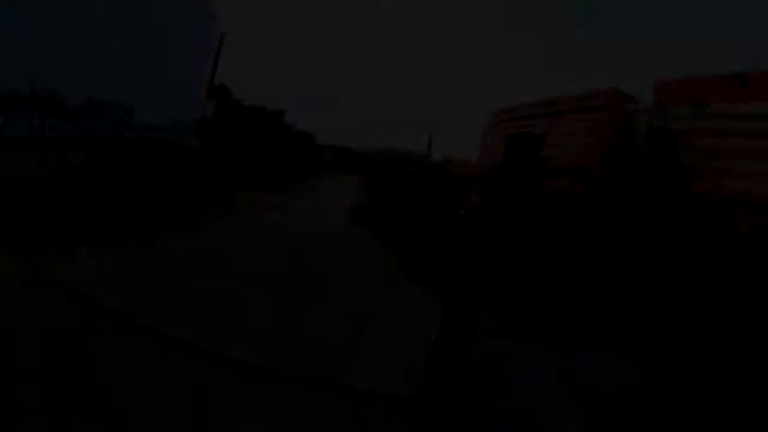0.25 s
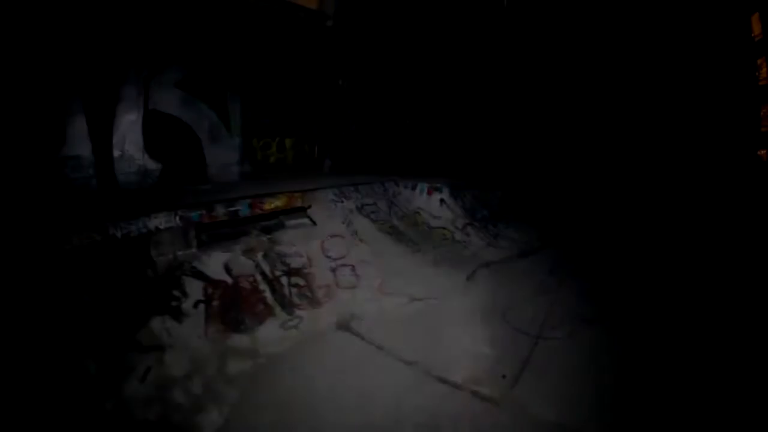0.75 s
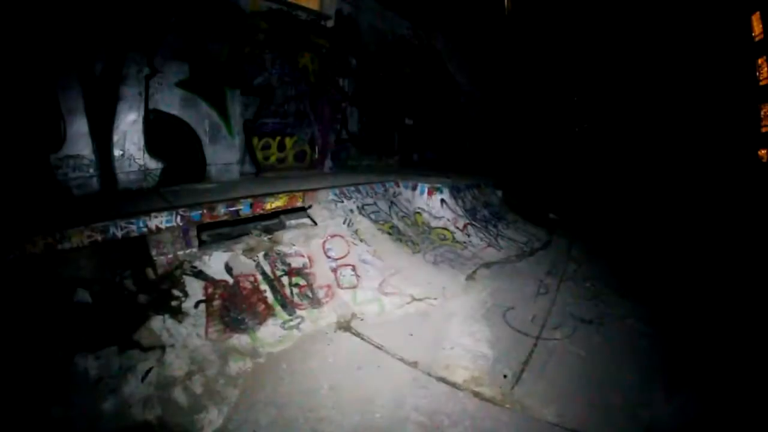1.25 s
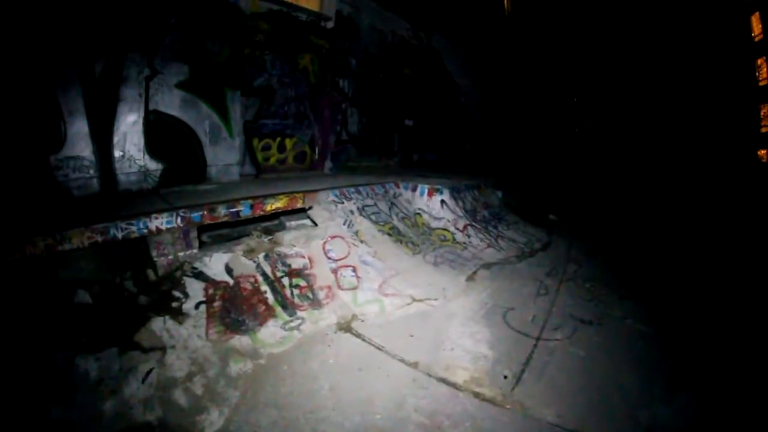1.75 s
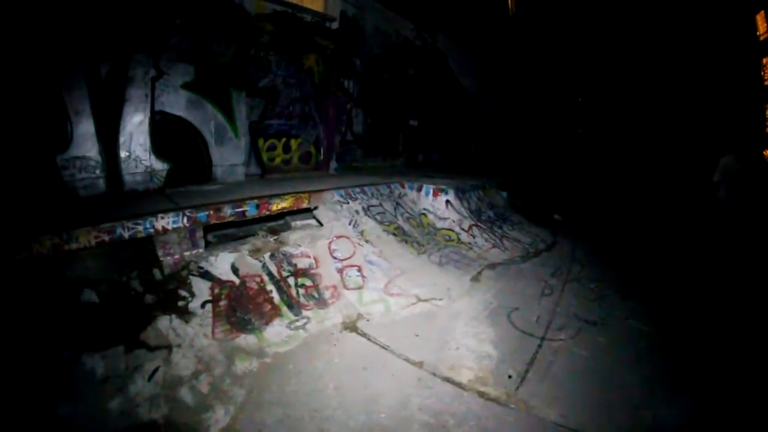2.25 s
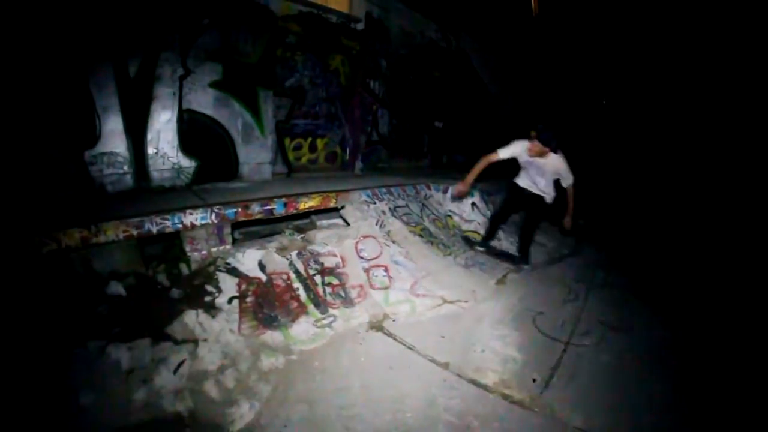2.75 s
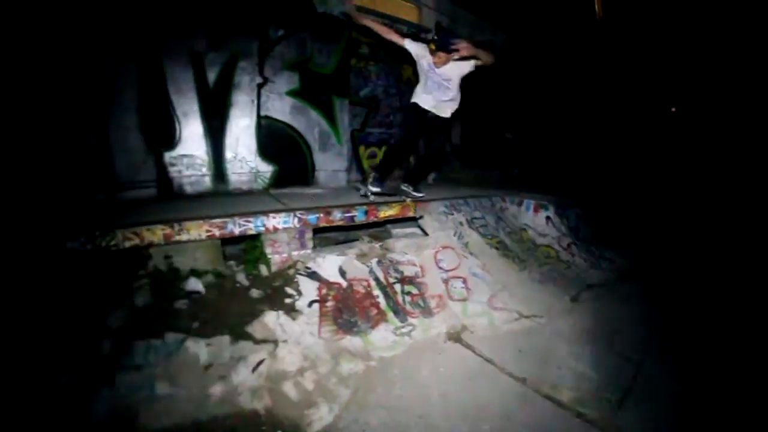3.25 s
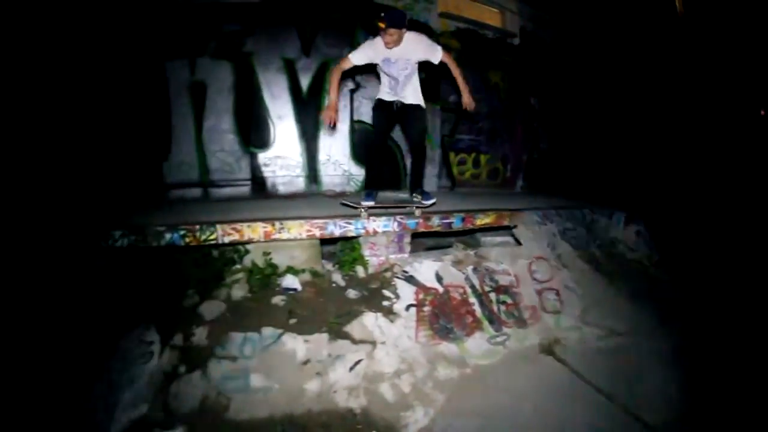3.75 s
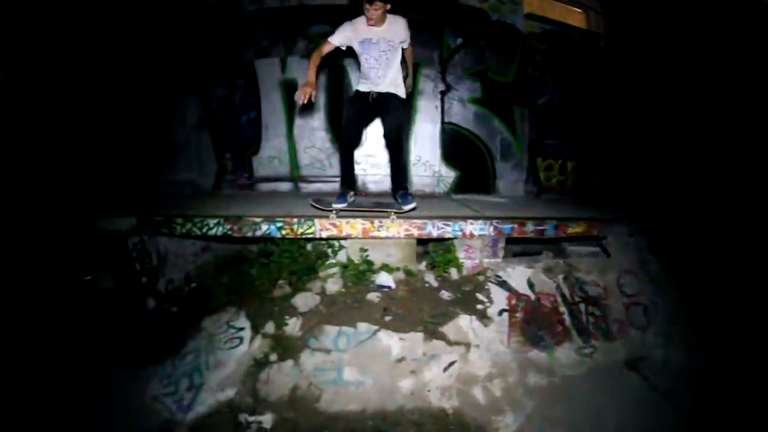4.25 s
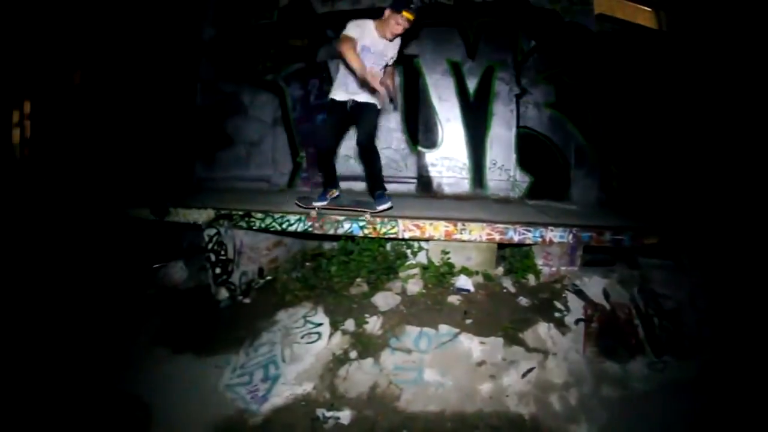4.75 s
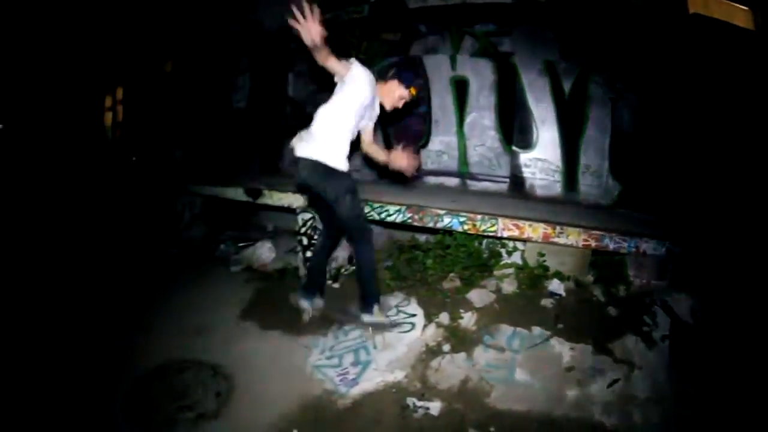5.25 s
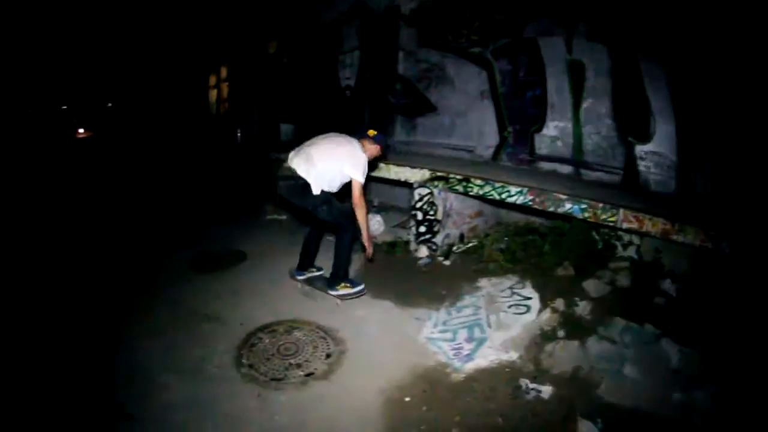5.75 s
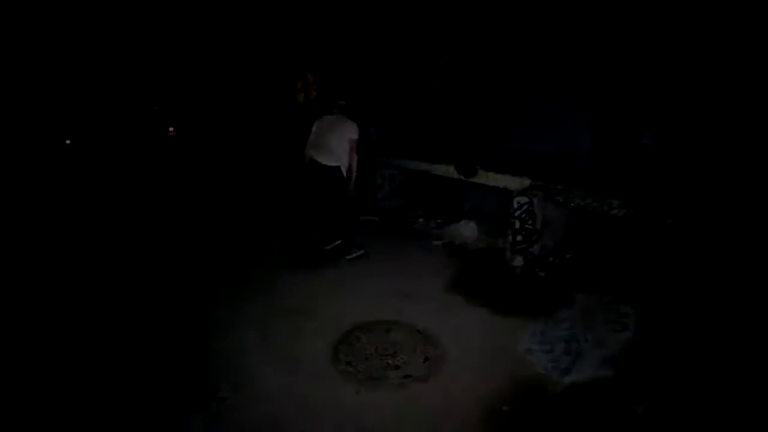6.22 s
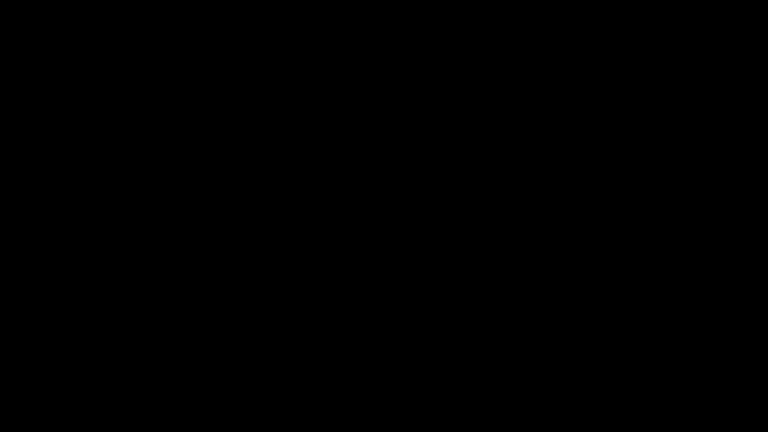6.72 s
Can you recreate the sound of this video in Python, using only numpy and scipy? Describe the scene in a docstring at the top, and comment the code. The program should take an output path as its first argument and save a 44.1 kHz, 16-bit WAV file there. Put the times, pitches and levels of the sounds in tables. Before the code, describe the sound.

A skateboard scuffs on concrete, drops and rumbles up a rough bank, clacks onto a ledge, rolls along, then slams down and rolls away.

```python
"""On outdoor concrete, a skateboard is scuffed into place, dropped, and rumbles up a rough bank.
It clacks onto a ledge, rides over its joints, scrapes off the end, lands hard and rolls away over gritty pavement.
Rolling is noise from tiny random impacts; each blow is a short burst of force that rings the board.
Scrapes are strokes of grit that ring the steel trucks. A wall behind the ledge answers the blows.
Faint air, shuffling, a puff of breeze and two ticks complete the mono scene."""
import sys
import numpy as np
from scipy import signal
from scipy.fft import rfft, irfft, next_fast_len
from scipy.io import wavfile
from scipy.ndimage import uniform_filter1d, map_coordinates

SR = 44100
rng = np.random.default_rng(int(sys.argv[2]) if len(sys.argv) > 2 else 0)


def generate_wav(signal):
    """Clip the signal to [-1, 1] and save it as 16-bit WAV at the path in sys.argv[1]."""
    frames = np.transpose(np.atleast_2d(signal))
    scaled = np.clip(frames, -1, 1) * 32767
    pcm = np.round(scaled).astype(np.int16)
    wavfile.write(sys.argv[1], SR, pcm)


N = 307906  # length of the scene in samples

# the run: dropped on the ground, onto the ledge, all wheels down, off its end, back on the ground
DROP_S, LOCK_S, RIDE_S, LEAVE_S, LAND_S = 1.62, 3.19, 3.335, 5.0, 5.44
# the closing fade: its start, its speed and how far down it goes
FADE_S, FADE_DB_PER_S, FADE_DEPTH_DB = 6.48, 241, 19.5
# resonances of the deck under the rider: pitch_hz, width_hz, level_db
BOARD_MODES = [(208, 48, 3), (290.7, 17, 6), (520, 120, -1), (617, 85, 0.5), (862, 16, 5.5),
               (1056, 19, -4.5), (1203, 45, -2), (1500, 46, -0.5), (2333, 35, -8), (2930, 26, -7.5)]
# colour of a bare contact, before the board rings: pitch_hz, relative level_db
CONTACT_TONE = [(40, -26.5), (120, -10.5), (290, -1), (430, -7.5), (1000, -2), (2000, -12), (7000, -14),
                (12000, -12.5), (15000, -14.5)]
# colour of the rolling on the smooth ledge: pitch_hz, relative level_db
SMOOTH_TONE = [(65, -11.5), (110, -12.5), (176, -1.5), (254, -17), (389, -18), (609, -11), (1290, -12),
               (3040, -30), (5600, -29), (12200, -23), (14300, -28)]
# where the low register meets the middle, and the middle meets the high: pitch_hz
REGISTER_EDGES_HZ = (400, 2500)


def rolling(level_db, tone, rate, spread_db, ring, rumble_db, roar_db, hiss_db,
            lumpy_db=1.17, surge_db=1.0, patchy_db=2.7, low_hz=50):
    """Wheels crush over grains; bumps swell the noise, the deck rings along, the rumble needs the rider's weight."""
    # the rider unweights the board and the rumble drops out: middle_s, half_length_s, depth_db
    lifts = [(2.412, 0.039, 22), (6.245, 0.093, 18)]
    road = grit(N, rate, spread_db) + .5 * rng.standard_normal(N)
    road = road * amp(lumpy_db * wobble(70) + surge_db * wobble(22))

    def surface(hz):
        low_cut = hz ** 2 / (hz ** 2 + low_hz ** 2)
        return causal(amp(along(tone, hz)) * low_cut) * (1 + ring * ringing(BOARD_MODES, hz))

    road = filtered(road, surface)
    rumble, roar, hiss = (filtered(road, lambda hz: register(hz, k)) for k in range(3))
    lift_db = sum(depth * np.exp(-((clock() - s) / half) ** 2) for s, half, depth in lifts)
    mix = amp(rumble_db - lift_db) * unit(patchy(rumble, patchy_db))
    mix += amp(roar_db) * unit(patchy(roar, patchy_db))
    mix += amp(hiss_db) * unit(hiss)
    return amp(level_db) * mix


def bank(rumble_grows=0.46, far_hiss_db=-13, near_hiss_db=-8.0, near_s=2.36, nearing_s=0.075):
    """Pressing into the bank deepens the rumble; the grit grows brighter as the board comes near."""
    # how hard the wheels work on the bank: time_s, level_db
    bank_work = [(1.65, -48), (2.356, -41), (2.454, -46.5), (2.478, -40), (2.848, -36.5), (2.872, -40),
                 (3.12, -45.5)]
    # colour of the rolling there: pitch_hz, relative level_db
    bank_tone = [(41, -45), (70, -8), (150, -2), (578, 2), (1110, 2.5), (1700, -9), (2660, -23),
                 (7820, -28.5), (12800, -24.5), (15000, -31)]
    level = follow(bank_work)
    load_db = level - np.mean(np.array(bank_work)[:, 1])
    near = .5 + .5 * np.tanh((clock() - near_s) / nearing_s)
    hiss_db = far_hiss_db + (near_hiss_db - far_hiss_db) * near
    sound = rolling(level, bank_tone, rate=1600, spread_db=3.7, ring=0.56,
                    rumble_db=rumble_grows * load_db - 7.5, roar_db=-5.0, hiss_db=hiss_db)
    return between(DROP_S, LOCK_S) * sound


def ledge(settled_db=-61, extra_start_db=5.5, slowing_s=0.67):
    """On the smooth ledge the ride starts louder and quietens as the board loses speed."""
    level = settled_db + extra_start_db * np.exp(-np.maximum(clock() - RIDE_S, 0) / slowing_s)
    sound = rolling(level, SMOOTH_TONE, rate=2000, spread_db=5.0, ring=0.48,
                    rumble_db=1.5, roar_db=-2, hiss_db=0.0)
    return between(RIDE_S, LEAVE_S) * sound


def pavement(hiss_steadiness=0.69, rumble_fade_db_per_s=5):
    """Rolling away: the rumble recedes, and the hiss of loose grit swings less than the roar."""
    # how hard the wheels work on the pavement: time_s, level_db
    pavement_work = [(5.53, -60.5), (5.588, -49.5), (5.754, -59), (5.886, -65), (6.162, -61),
                     (6.328, -52.5), (6.386, -58.5)]
    # colour of the rolling there: pitch_hz, relative level_db
    pavement_tone = [(41, -41), (70, -3.5), (114, -12.5), (153, -0.5), (332, -7), (567, -4), (1480, -10),
                     (2360, -20), (2880, -16), (4490, -23.5), (14300, -10)]
    level = follow(pavement_work)
    load_db = level - np.mean(np.array(pavement_work)[:, 1])
    away_db = rumble_fade_db_per_s * np.maximum(clock() - LAND_S, 0)
    sound = rolling(level, pavement_tone, rate=2800, spread_db=5, ring=0.29,
                    rumble_db=2.5 - away_db, roar_db=2.5, hiss_db=6.5 - hiss_steadiness * load_db)
    return between(LAND_S, FADE_S + FADE_DEPTH_DB / FADE_DB_PER_S) * sound


def free_wheels(spin_db=-58, fade_db_per_s=21, tipped_db=3):
    """Tipped onto the ledge and flying off its end, the unloaded wheels only whirr and run down."""
    def run_down(start, end):
        return between(start, end) * amp(-fade_db_per_s * np.maximum(clock() - start, 0))

    whirr = rolling(spin_db, SMOOTH_TONE, rate=6400, spread_db=5.0, ring=0.48,
                    rumble_db=-19.5, roar_db=-2.0, hiss_db=0.5)
    return whirr * (amp(tipped_db) * run_down(LOCK_S, RIDE_S) + run_down(LEAVE_S, LAND_S))


def wheel_hum(waver_hz=20, flutter_db=3.0):
    """A fuzzy tone that sinks as the wheels slow down."""
    # coasting wheels: start_s, end_s, first pitch_hz, sag_hz_per_s, level_db, fade_db_per_s (negative grows)
    hums = [(1.72, 2.422, 704.3, 195.1, -50, -2.5), (3.499, 4.59, 647.5, 51.8, -58.5, 4.5)]
    out = np.zeros(N)
    for start, end, hz, sag, db, fade in hums:
        age = np.clip(clock() - start, 0, end - start)
        turns = np.cumsum(hz - sag * age + waver_hz * wobble(90)) / SR
        tone = unit(np.sin(2 * np.pi * turns) * amp(flutter_db * wobble(50)))
        out += between(start, end) * amp(db - fade * age) * tone
    return out


def booms(boom_hz=153, width_octaves=0.39):
    """Under extra weight the deck passes on the lowest part of the road noise."""
    # the rider presses down and the deck booms: middle_s, half_length_s, level_db
    presses = [(2.062, 0.037, -53), (2.226, 0.048, -56), (2.848, 0.069, -45.5), (2.968, 0.05, -44)]
    low = filtered(rng.standard_normal(N), lambda hz: bell(hz, boom_hz, width_octaves))
    return unit(low) * sum(amp(db) * np.exp(-((clock() - s) / half) ** 2) for s, half, db in presses)


def clacks(joint_thump_db=-10.5, wheel_lag_s=.0085):
    """Single blows where the board comes down, and a quick pair wherever an axle crosses a joint or an edge."""
    # the board comes down, tail, wheels and deck in turn, then settles: start_s, knock level_db,
    # crack_db and strongest ring_hz, thump_db, tail_factor (crack and thump relative to the knock)
    falls = [(1.574, -34, -17, 730, -8, 0.8), (1.592, -35.5, -9.5, 815, -8.5, 0.95),
             (3.2004, -27, -4, 940, -21, 0.23), (3.2077, -32, 4, 890, -22, .4),
             (5.3674, -21.5, -3, 1180, -5, 1.5), (5.3774, -27, 0, 1503, -7.5, .9),
             (5.382, -26, -14.5, 1280, 1, 0.96), (5.3887, -28.5, 4, 1085, -1, 0.64),
             (5.3999, -21, -4.5, 800, -5, 0.46), (5.4055, -16.5, -3, 1180, -7, .65),
             (5.413, -28.5, -5.5, 1214, -2, 0.69), (5.429, -38, -9, 870, -6, 0.52),
             (5.4405, -36, -9.5, 740, -5.5, 0.5), (5.506, -42.5, -5.5, 880, -4, .6)]
    # an axle crosses a joint or an edge: start_s, knock level_db, crack_db relative to the knock,
    # strongest ring_hz, second_wheel_db relative to the first
    joints = [(2.141, -37, -16, 600, -8), (2.205, -38, -15, 400, -3.5), (2.357, -36.5, -14, 565, -6),
              (2.61, -36.5, -11, 675, -1), (2.771, -34, -4, 534, -10), (2.828, -36, -6, 500, -2),
              (3.061, -40.5, -2.5, 620, 0), (3.334, -42, -1.5, 490, -2.5), (3.41, -41.5, -2, 525, -9),
              (3.446, -31.5, 2.5, 630, -2.5), (3.7078, -37, 1.5, 477, 1.5), (3.939, -36, -5, 634, -5),
              (4.219, -46.5, -2.5, 526, -8), (4.843, -40.5, -2.5, 830, -6), (4.9324, -42.5, 0.5, 284, 3),
              (5.622, -51, 5, 700, -4), (6.151, -49.5, 7.5, 880, 1), (6.28, -44.5, -1.5, 533.5, 5.5)]
    out = np.zeros(N)
    for s, *strike in falls:
        add(out, s, blow(*strike))
    for s, db, crack_db, ring_hz, second_db in joints:
        add(out, s, blow(db, crack_db, ring_hz, joint_thump_db, 0.98))
        add(out, s + wheel_lag_s, blow(db + second_db, crack_db, ring_hz, joint_thump_db, 1))
    return out


def pits(ring_hz=1100, thump_db=-5.5, tail=0.78):
    """The wheels knock through small pits or off edges at uneven moments, each ringing at another pitch."""
    # start_s, knock level_db, crack_db relative to the knock
    pit_knocks = [(2.462, -43, -7), (2.507, -42, -12), (2.548, -42, -11), (2.557, -45, -3),
                  (2.638, -34, -6), (2.647, -41, -6), (2.704, -38, -0.5), (2.843, -38.5, -3),
                  (2.938, -39.5, -3.5), (3.725, -41.5, -1.5), (3.956, -46.5, -7), (4.603, -49.5, -1),
                  (5.0403, -42.5, 1.5), (5.574, -47.5, -14), (5.844, -51.5, -4)]
    out = np.zeros(N)
    for s, db, crack_db in pit_knocks:
        pitch_hz = ring_hz * 2 ** rng.uniform(-0.54, 0.66)
        add(out, s, blow(db, crack_db, pitch_hz, thump_db, tail))
    return out


def blow(db, crack_db, ring_hz, thump_db, tail, focus_db=6, focus_octaves=0.27, snap=1.0, snap_t60=0.013,
         attack=0.00027, push=5, contact_time=.0001, hardening=0.18, deck_ring=3):
    """A push, a hard snap and a short rattle of the trucks, ringing the board at new strengths."""
    # an ordinary blow, and its rattle before the tail factor
    usual_db, rattle_t60_s = -40.5, 0.048
    # this much more crack, or more force, halves the rattle
    clean_halves_db, weight_halves_db = 8, 14
    t = np.arange(SR // 4) / SR
    over_db = db - usual_db
    # clean or heavy contacts pin the trucks and cut the rattle short
    halvings = crack_db / clean_halves_db + max(over_db, 0) / weight_halves_db
    t60 = tail * rattle_t60_s * .5 ** halvings
    rattle = grit(len(t), 6000, 5.5) * amp(-60 * t / t60)
    crisp = snap * rng.standard_normal(len(t)) * amp(-60 * t / (tail * snap_t60))
    shove = t * np.exp(-t / contact_time)
    force = (crisp + rattle) * (1 - np.exp(-t / attack)) + push * shove / shove.sum()
    gains_db = rng.normal(0, 0.69, (len(BOARD_MODES), 1))

    def struck_board(hz):
        # where the deck is struck decides which of its resonances speak most
        focus = focus_db * bell(hz, ring_hz, focus_octaves)
        # a harder blow stiffens the contact and tilts the knock upwards
        tilt = hardening * over_db * np.log2(np.clip(hz, *REGISTER_EDGES_HZ))
        colour = amp(along(CONTACT_TONE, hz) + focus + tilt)
        return causal(colour * np.abs(5.0 + deck_ring * ringing(BOARD_MODES, hz, gains_db)))

    knock = filtered(force, struck_board)
    out = np.zeros(len(t))
    # thump, knock and crack; bright, glancing contacts carry less of the rider's weight
    for k, level in enumerate([thump_db - max(crack_db, 0), 0, crack_db]):
        part = filtered(knock, lambda hz: causal(register(hz, k)))
        # the level is that of the loudest 5 ms
        loudest = np.sqrt(uniform_filter1d(part ** 2, size=220, mode="constant").max())
        out += amp(db + level) * part / loudest
    return out


def clatter(start_s=5.369, length_s=0.033, level_db=-33, release=0.015, ring=0.66):
    """Between the blows of the landing, loose trucks and wheels keep shaking the deck."""
    out, t = np.zeros(N), np.arange(SR // 4) / SR
    shake = grit(len(t), 2300, 4.2) * np.exp(-np.maximum(t - length_s, 0) / release)

    def deck_response(hz):
        return causal(amp(along(CONTACT_TONE, hz)) * np.abs(1 + ring * ringing(BOARD_MODES, hz)))

    deck = filtered(shake, deck_response)
    add(out, start_s, amp(level_db) * unit(deck) * np.sqrt(length_s / t[-1]))
    return out


def scrapes():
    """The trucks drag and bite in short strokes, each singing at its own pitch."""
    # a truck scrapes on concrete (the stroke at 3.163 s is the wheels roaring along the ledge's edge): start_s,
    # level_db, centre_hz, length_s, steel ring_hz
    strokes = [(1.249, -42.5, 1380, 0.015, 1730), (1.267, -39.5, 2900, 0.013, 1870),
               (1.329, -38.5, 1950, .015, 1010), (1.348, -36, 2460, 0.012, 2850),
               (1.376, -39.5, 1200, .014, 1060), (1.391, -39, 2260, 0.016, 1080),
               (1.435, -42, 1210, .013, 1110), (1.449, -39.5, 1840, 0.016, 1110),
               (1.473, -45, 1090, 0.037, 857), (1.590, -37.5, 1260, 0.028, 990),
               (2.135, -46, 1900, .022, 2110), (3.163, -43, 900, .026, 860),
               (3.214, -42.5, 1300, 0.021, 1790), (3.235, -45, 1880, .022, 2750),
               (3.268, -46, 1580, .04, 2630), (5.041, -41, 2130, 0.016, 1790),
               (5.112, -43, 2100, .015, 1155)]
    out = np.zeros(N)
    for s, *stroke in strokes:
        add(out, s, rasp(*stroke))
    return out


def rasp(db, centre, length, ring_hz, ring_db=24, ring_width_hz=70, octaves=0.72, spread=0.22,
         attack=0.0017, release_share=0.45, steel_ring=9):
    """A truck drags over the grain with its own brightness; the steel rings on, one tone above the rest."""
    # colour of the dragging: pitch_hz, relative level_db
    rasp_tone = [(100, -23), (280, 13.5), (450, 6.5), (3000, -4.5), (6500, -2), (15000, -15.5)]
    # the free-ringing steel trucks: pitch_hz, width_hz, level_db
    truck_modes = [(1079, 59, -6), (1810, 41, -5.5), (2460, 64, -4.5), (2900, 71, -1), (3430, 90, -3.5)]
    t = np.arange(SR // 4) / SR
    stroke = (1 - np.exp(-t / attack)) * np.exp(-np.maximum(t - length, 0) / (release_share * length))

    def body(hz):
        focus = spread + bell(hz, centre, octaves)
        one_tone = ringing([(ring_hz, ring_width_hz, ring_db)], hz)
        steel = np.abs(6.0 + steel_ring * ringing(truck_modes, hz) + one_tone)
        return causal(amp(along(rasp_tone, hz)) * focus * steel)

    drag = filtered(stroke * grit(len(t), 4500, 4.4), body)
    return amp(db) * unit(drag) * np.sqrt(length / t[-1])


def wall(x, size=13230):
    """A diffuse answer from the wall and bank, changing as the board moves on; mostly the treble dies sooner."""
    # how fast the answer dies by 60 dB: pitch_hz, decay_s
    wall_decay = [(100, 0.37), (1000, 0.29), (4000, 0.3), (14000, 0.17)]
    # colour of the answer: pitch_hz, level_db
    wall_tone = [(450, -3), (1000, 2.5), (2600, -1), (12000, 1.5)]
    out = np.zeros(N)
    for start in range(0, N, size):
        hz, t, z = signal.stft(rng.standard_normal(SR // 2), SR, nperseg=256)
        decay = amp(-60 * t / along(wall_decay, hz)[:, None])
        tail = signal.istft(z * decay, SR, nperseg=256)[1]
        answer = coloured(tail / np.linalg.norm(tail), wall_tone)
        add(out, start / SR, signal.fftconvolve(x[start:start + size], answer))
    return out


def crunches(sharpness=3, t60=0.045):
    """Before the run, small crunches of grit: each is a tiny burst around one pitch."""
    # start_s, level_db, centre_hz
    grit_bursts = [(0.048, -51, 424), (0.054, -53.5, 2060), (0.077, -59.5, 1980), (0.114, -63, 6140)]
    out, t = np.zeros(N), np.arange(SR // 8) / SR
    decay = amp(-60 * t / t60)
    for s, db, centre in grit_bursts:
        grains = grit(len(t), 5330, 4.5) * decay
        burst = filtered(grains, lambda hz: ringing([(centre, centre / sharpness, 0)], hz))
        add(out, s, amp(db) * unit(burst) * np.sqrt(np.mean(decay ** 2)))
    return out


def ticks(count=4, gap_s=.0049, loss_db=3.5):
    """Two faint, dry ticks, each a short burr of clicks, every click weaker than the last."""
    # start_s, level_db of the first click
    tick_times = [(0.467, -50), (6.716, -64.5)]
    # the tones in a click: pitch_hz, level_db, decay_s (to fall by 60 dB)
    tick_tones = [(766, 1, .02), (1670, 4.5, 0.015), (2590, -6, .012)]
    out, t = np.zeros(N), np.arange(SR // 8) / SR
    ring = sum(amp(db - 60 * t / t60) * np.sin(2 * np.pi * hz * t) for hz, db, t60 in tick_tones)
    for s, db in tick_times:
        for k in range(count):
            add(out, s + k * gap_s, amp(db - k * loss_db) * ring / np.abs(ring).max())
    return out


def outdoors(air_db=-66.5, shuffle_db=-59, shuffle_fade_db_per_s=67, puff_s=0.233, puff_db=-56):
    """Filtered noise makes faint air and one puff of breeze; tiny impacts make fading shuffles and crunches."""
    # colour of the air: pitch_hz, relative level_db
    air_tone = [(45, -2.5), (110, -9.5), (400, -22), (1100, -18.5), (3000, -36), (15000, -49.5)]
    shuffle_tone = [(100, -5.0), (450, 5.0), (2200, -7.0), (14000, -10.5)]
    puff_tone = [(20, -16.0), (50, -6.0), (400, -72)]
    air = amp(air_db) * unit(coloured(rng.standard_normal(N), air_tone))
    feet = amp(shuffle_db - shuffle_fade_db_per_s * clock())
    rustle = feet * unit(coloured(grit(N, 2700, 7.3), shuffle_tone))
    breeze = unit(coloured(rng.standard_normal(N), puff_tone))
    puff = amp(puff_db) * swell(puff_s, .008, .07) * breeze
    return air + rustle + puff + crunches()


def fades(dip_s=0.48, dip_depth_db=20.5, dip_recovers_s=0.12, silent_s=6.74):
    """The level dips briefly before the run, fades down after it, then stops."""
    dip_db = dip_depth_db * swell(dip_s, 0.058, dip_recovers_s)
    out_db = np.clip(FADE_DB_PER_S * (clock() - FADE_S), 0, FADE_DEPTH_DB)
    return amp(-dip_db - out_db) * (clock() < silent_s)


def grit(n, rate, spread_db):
    """Tiny impacts, rate a second, a few much larger than the rest."""
    sizes = amp(spread_db * np.minimum(rng.standard_normal(n), 3))
    return unit((rng.random(n) < rate / SR) * sizes * rng.choice([-1, 1], n))


def patchy(x, depth_db):
    """The load shifts from wheel to wheel, so each band swells and fades on its own."""
    z = signal.stft(x, nperseg=1024)[2]
    field = uniform_filter1d(rng.standard_normal(z.shape), size=4, axis=0)
    field = uniform_filter1d(field, size=5, axis=1)
    return signal.istft(z * amp(depth_db * unit(field)), nperseg=1024)[1][:len(x)]


def ringing(modes, hz, gains_db=0):
    """Response of a set of (Hz, width Hz, dB) resonances."""
    centre, width, db = np.transpose(modes)[:, :, None]
    damping = 1j * hz * width
    return np.sum(amp(db + gains_db) * damping / (centre ** 2 - hz ** 2 + damping), axis=0)


def register(hz, index):
    """Gain of the low, middle or high register."""
    low, mid = (1 / (1 + (hz / edge) ** 8) for edge in REGISTER_EDGES_HZ)
    return np.sqrt([low, mid * (1 - low), 1 - mid][index])


def bell(hz, centre, octaves):
    """A smooth hump around a centre pitch, its width given in octaves."""
    return np.exp(-.5 * (np.log2((hz + 1) / centre) / octaves) ** 2)


def filtered(x, response):
    """x times a response of frequency."""
    m = 2 * next_fast_len(len(x) // 2 + 4096)
    return irfft(rfft(x, m) * response(np.fft.rfftfreq(m, 1 / SR)), m)[:len(x)]


def causal(gain):
    """The minimum-phase response with this gain: nothing sounds before the blow."""
    cep = irfft(np.log(np.maximum(gain, 1e-6)))
    half = len(cep) // 2
    cep[1:half] *= 2
    cep[half + 1:] = 0
    return np.exp(rfft(cep))


def coloured(x, points):
    """x through a (Hz, dB) spectrum."""
    return filtered(x, lambda hz: causal(amp(along(points, hz))))


def along(points, hz):
    """Read (Hz, value) points on a log frequency axis."""
    f, v = np.transpose(points)
    return np.interp(np.log(hz + 1), np.log(f + 1), v)


def follow(rows):
    """Join (s, value) points into one value per sample."""
    s, value = np.transpose(rows)
    return np.interp(clock(), s, value)


def wobble(rate):
    """A smooth random curve, rate knots a second."""
    knots = rng.standard_normal(int(N * rate / SR) + 4)
    return map_coordinates(knots, [np.arange(N) * rate / SR])


def clock():
    """Time of each sample in seconds."""
    return np.arange(N) / SR


def between(start, end, ramp=.02):
    """1 from start to end, with soft edges."""
    return np.clip(np.minimum(clock() - start, end - clock()) / ramp + .5, 0, 1)


def swell(s, attack, release):
    """An envelope that rises to 1 at s and dies away."""
    t = clock() - s
    return np.exp(np.minimum(t / attack, -t / release))


def add(out, s, sound):
    """Mix a short sound in at time s."""
    part = out[round(s * SR):][:len(sound)]
    part += sound[:len(part)]


def amp(db):
    """Decibels to gain."""
    return 10 ** (np.asarray(db) / 20)


def unit(x):
    """Scale to an average (rms) level of 1."""
    return x / np.sqrt(np.mean(x ** 2) + 1e-20)


def scene():
    """The whole run in mono, on two equal channels; only the blows and scrapes reach the wall."""
    wheels = bank() + ledge() + free_wheels() + pavement() + wheel_hum() + booms()
    blows = clacks() + clatter() + scrapes() + pits()
    answer = amp(-12.5) * wall(blows)
    mono = fades() * (wheels + blows + answer + outdoors()) + ticks()
    return np.array([mono, mono])


def record(dry, top_hz=15300):
    """A very steep filter keeps almost nothing above the top frequency."""
    def band_limit(hz):
        return causal(1 / np.sqrt(1 + (hz / top_hz) ** 160))

    return np.array([filtered(x, band_limit) for x in dry])


dry = scene()
out = record(dry)
generate_wav(out)
```